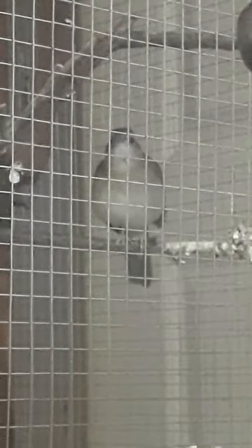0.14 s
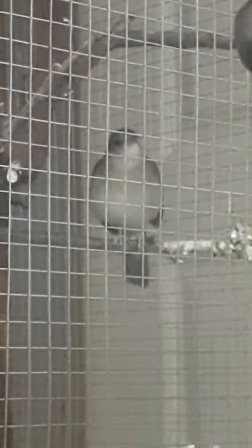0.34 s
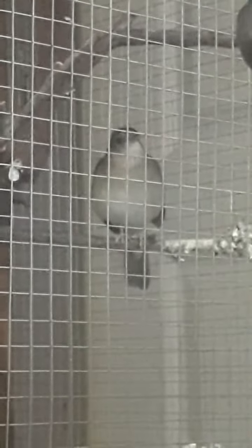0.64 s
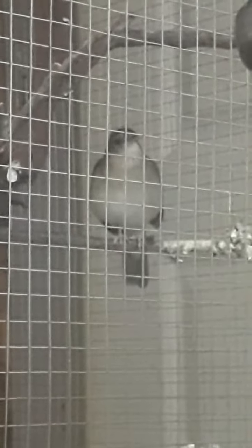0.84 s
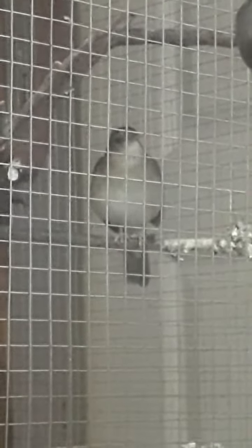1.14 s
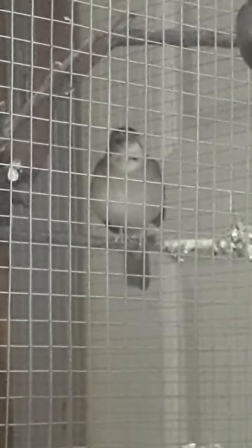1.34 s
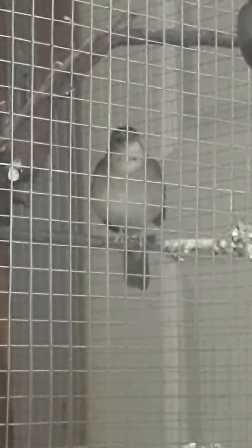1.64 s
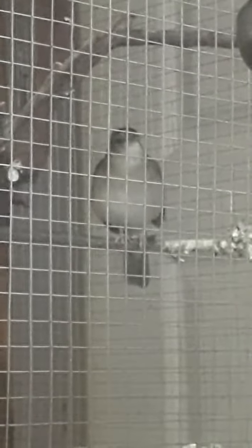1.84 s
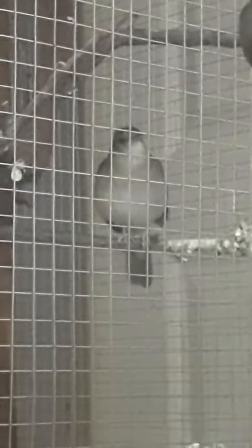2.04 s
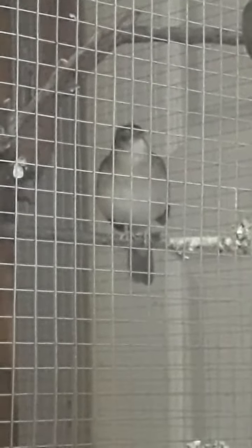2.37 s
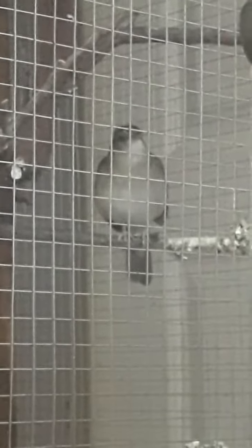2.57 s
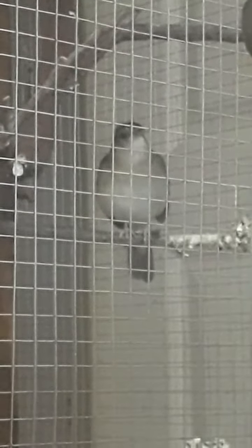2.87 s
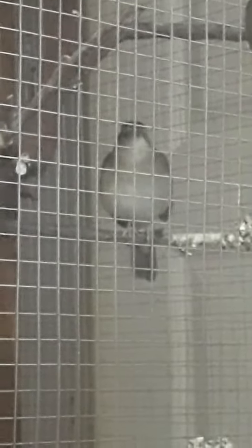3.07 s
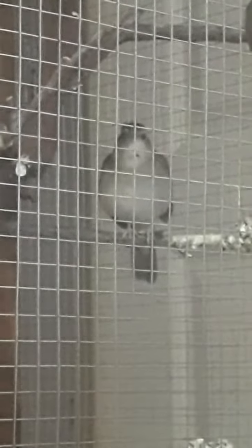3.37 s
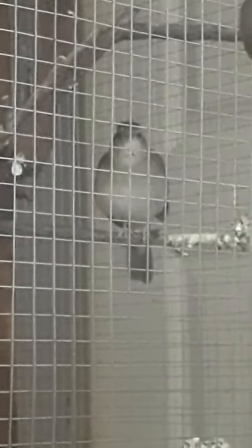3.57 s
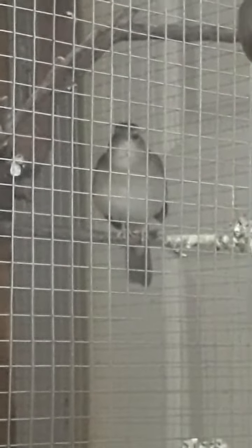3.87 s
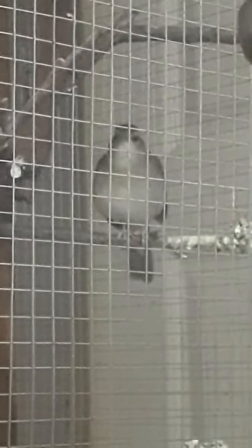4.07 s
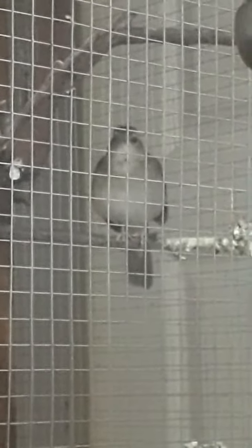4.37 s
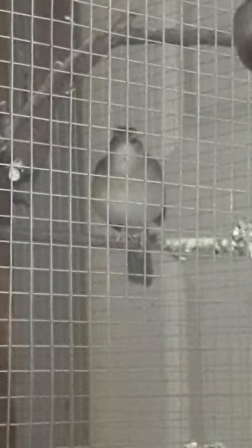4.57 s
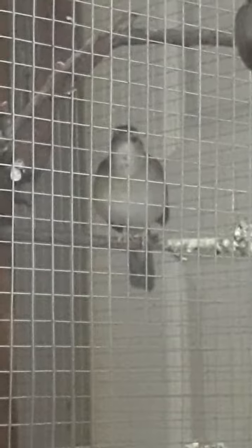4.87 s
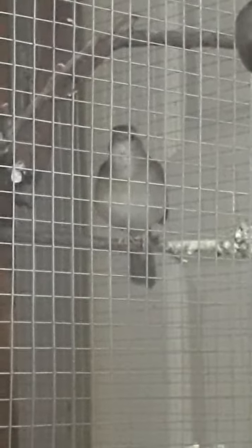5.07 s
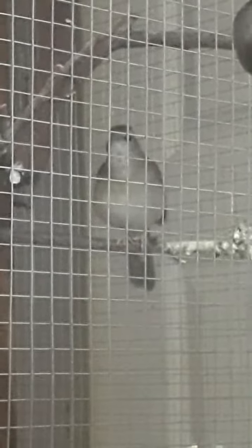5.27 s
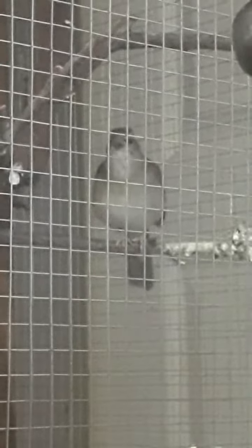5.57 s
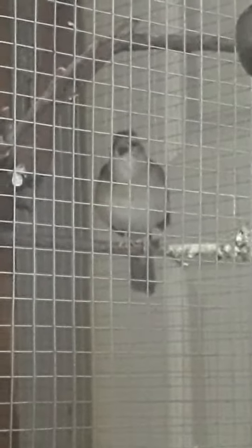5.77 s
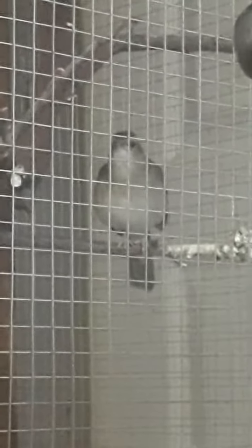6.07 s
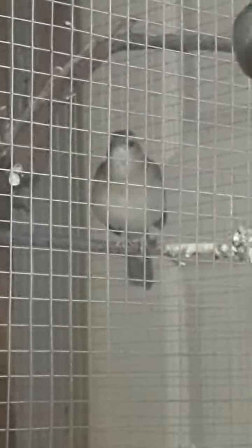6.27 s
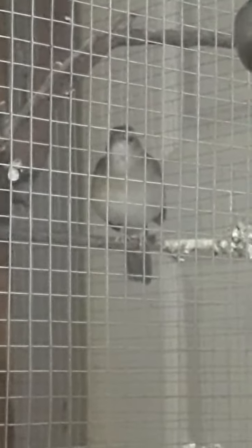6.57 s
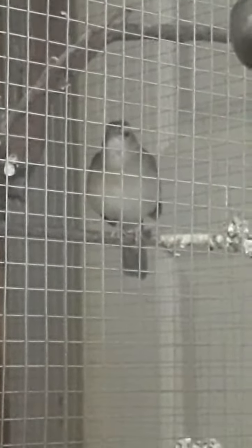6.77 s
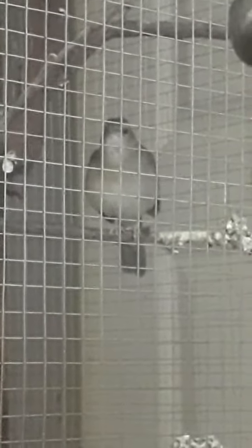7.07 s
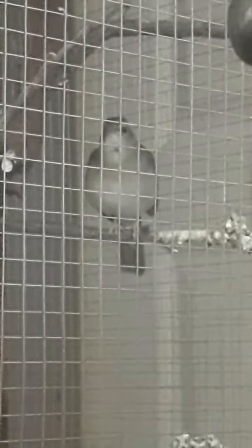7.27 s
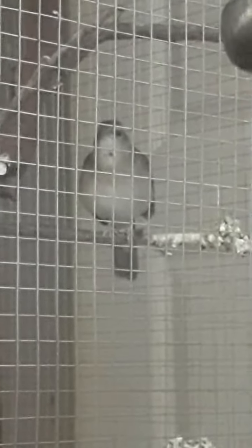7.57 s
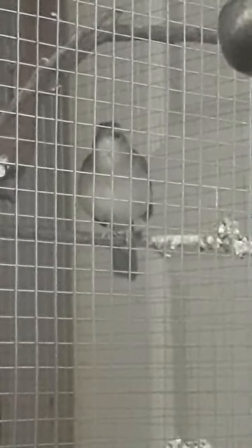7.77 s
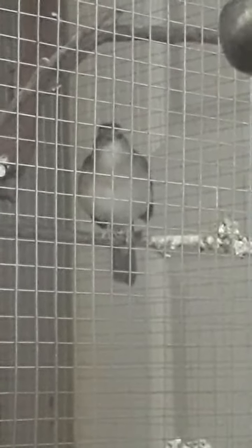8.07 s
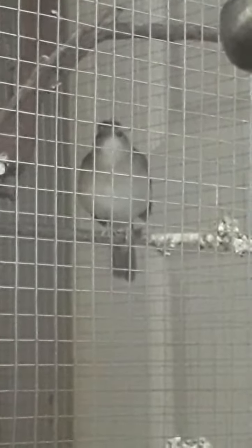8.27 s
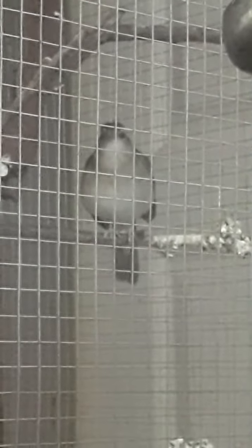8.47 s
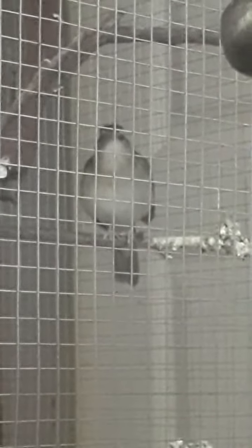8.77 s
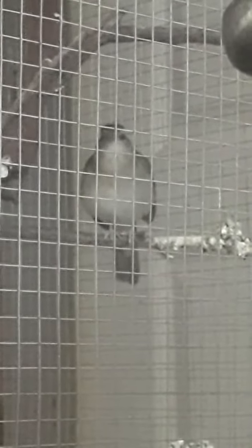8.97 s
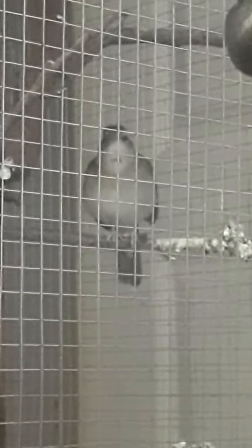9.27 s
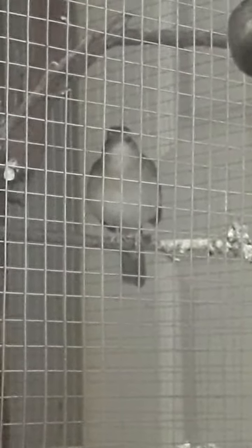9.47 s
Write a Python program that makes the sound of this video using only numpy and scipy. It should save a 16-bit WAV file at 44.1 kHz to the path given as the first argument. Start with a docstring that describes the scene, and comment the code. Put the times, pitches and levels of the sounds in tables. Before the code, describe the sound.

A caged songbird sings varied whistles, croaks and rattles with short pauses in a small, slightly echoing room.

```python
"""A caged nightingale sings in a small hard-walled room.
Membranes in its syrinx vibrate steadily in whistles and irregularly in rasps, slurs and wheezes;
pulses ring its throat in rattles of short croaks. Wall reflections smear every note.
Something rustles and ticks softly at the cage, over a faint ring and still air.
The loudest notes distort the microphone a little."""
import sys
import numpy as np
from scipy import signal
from scipy.fft import rfft, irfft, next_fast_len
from scipy.io import wavfile

SR = 44100
rng = np.random.default_rng(int(sys.argv[2]) if len(sys.argv) > 2 else 0)


def log_audio(samples):
    """Write samples as a 16-bit WAV file to the path given in sys.argv[1]."""
    # one column per channel
    frames = np.atleast_2d(samples).T
    # limit to full scale, then quantise
    limited = np.clip(frames, -1, 1)
    pcm = np.round(limited * 32767).astype(np.int16)
    wavfile.write(sys.argv[1], SR, pcm)


N = 424683

# Columns ending in _at are positions within a sound, from 0 to 1.
# gliding notes: start_s, length_s, from_hz, to_hz, level_db, swell_at
WHISTLES = [(0.425, 0.053, 3860, 4330, -43, 0.1), (0.502, .222, 3385, 5154, -34.5, 0.61),
            (1.004, 0.054, 3820, 4200, -40, 0.2), (1.092, 0.19, 3990, 5160, -35.5, 0.59),
            (1.599, 0.038, 3950, 4330, -40, 0.12), (1.673, 0.075, 3570, 4470, -40, .3),
            (1.78, 0.099, 4800, 4780, -45, 0.18), (4.112, .085, 3040, 2800, -39, 0.6),
            (5.256, 0.089, 3080, 3768, -29.5, 0.63), (6.148, 0.056, 6800, 7550, -43.5, 0.23),
            (6.216, .055, 5960, 5290, -43.5, 0.99), (6.647, 0.027, 2180, 2850, -41, 0.36),
            (6.788, 0.027, 2635, 3460, -32.5, 0), (6.917, .025, 4970, 5200, -49.5, .4),
            (9.258, 0.034, 2460, 2910, -37.5, 0.4)]  # soft, levelling off
CHIRPS = [(1.09, 0.022, 2190, 2895, -35, 0.66), (2.429, 0.018, 2250, 2820, -38, 0.44),
          (3.038, 0.025, 2150, 2926, -29.5, 0.66), (3.145, .029, 2490, 3770, -25.5, .5),
          (3.292, .03, 2410, 3770, -28.5, 0.45)]  # short up-sweeps
WHEEZES = [(3.993, .255, 1481, 1826, -41.5, 0.17), (4.545, 0.18, 1397, 1834, -41.5, .3)]  # low and strained
WHINES = [(9.33, .30, 1481, 2260, -55.5, 0.73)]  # rising in pitch, slowly fading
# harsh glides: start_s, length_s, from_hz, to_hz, level_db, swell_at, roughness
RASPS = [(0, .027, 5500, 5725, -17, 0, 0.074), (0, .026, 7370, 8420, -15.5, 0, .11),
         (0.716, .065, 4706, 2854, -31.5, 0.59, .08), (1.279, .05, 4980, 3090, -31.5, 0.93, .07),
         (2.002, .05, 2610, 2846, -51, 0.06, .06), (2.098, .075, 2920, 3600, -42, 1, .12),
         (2.177, .08, 4075, 4900, -32.5, 0.95, 0.027), (2.202, 0.043, 5920, 6270, -23, 0.42, 0.0064),
         (4.163, 0.069, 5150, 5450, -49, .4, .08), (4.626, 0.078, 3550, 3474, -30.5, 1, 0.076),
         (4.814, .11, 4160, 3100, -35.5, 0.55, .1), (5.126, .134, 4580, 5100, -44, 0.01, 0.22),
         (5.486, .035, 4700, 5200, -42, .8, .1), (6.059, 0.0146, 3310, 2290, -25.5, 0, 0.116),
         (6.092, 0.013, 3010, 2080, -33, 0.37, .12), (6.585, .04, 3506, 4100, -41.5, .6, .16),
         (6.811, .042, 3664, 4580, -37, 0.4, .09), (7.574, .085, 3780, 6350, -42, 0.81, .12),
         (7.758, .08, 3820, 6450, -43.5, .75, .12)]
# falling slurs: start_s, length_s, from_hz, to_hz, level_db
SLURS = [(4.258, 0.19, 3697, 2210, -27), (4.692, .16, 3485, 2282, -21.5)]
# low two-note calls: start_s, then the held note's delay_s, length_s, from_hz, to_hz, level_db, swell_at
LOW_CALLS = [(4.966, 0.053, 0.061, 2370, 2350, -14, 0.35), (5.14, 0.048, 0.064, 2207, 2192, -12, 0.54),
             (5.327, .049, .056, 2242, 2105, -10.5, 0.34)]
# high three-note calls: start_s, middle_from_hz, middle_to_hz, middle_db,
# then the warble's delay_s, length_s, from_hz, to_hz, level_db
HIGH_CALLS = [(5.516, 3716, 3415, -11, 0.053, 0.052, 5022, 5494, -7.5),
              (5.686, 3258, 3460, -14.5, 0.057, 0.041, 4900, 5264, -9.5),
              (5.859, 3288, 3554, -18, .048, 0.043, 5110, 5153, -11.5)]
# arched zips: start_s, rise_s, fall_s, end_hz, flick_hz, level_db, rasp_db
ZIPS = [(8.325, 0.011, 0.032, 3565, 1301, -19, -38), (8.422, 0.011, .028, 3400, 1352, -16, -32.5),
        (8.578, .023, 0.032, 3116, 0, -18.5, -48), (8.694, 0.01, .036, 3370, 1201, -18, -36.5)]
# hooked whistles: start_s, length_s, from_hz, top_hz, end_hz, hook_s, level_db, swell_at
HOOKS = [(8.887, .07, 4080, 4280, 2830, 0.031, -17.5, 0.64),
         (8.967, .078, 2807, 3560, 2100, 0.018, -16.5, 0.38),
         (9.345, 0.0553, 6540, 7090, 5910, .026, -20, 0.98)]
# one whistle that dips and swoops up: time_s, pitch_hz, level_db
SWOOP = [(7.914, 3170, -37.5), (7.938, 3073, -26.5), (7.965, 2973, -30), (8.002, 4066, -20.5),
         (8.045, 4520, -22), (8.081, 4637, -21)]
# harmonics of each kind of note, from the fundamental up: relative_db
WHISTLE_DB = [-1.5, -29.5, -34.5, -44.5, -39.5]
CHIRP_DB = [11, -3.5, -16, -26.5]
WHEEZE_DB = [0, 4, 5.5, -14, -16, -17]
WHINE_DB = [8, -3]
RASP_DB = [4.5, -23.5, -34, -39, -35.5, -31]
SLUR_DB = [6, -24, -34, -40, -33.5, -34]
LOW_CALL_DB = [-3.5, -38, -40.5, -42.5, -34.5, -40, -41, -48.5]
HIGH_CALL_DB = [-6.5, -39.5, -49.5, -48.5]
ZIP_DB = [-6, -34, -46.5, -56]
FULL_DB = [-4, -34, -43, -47.5, -44]
# double croaks: start_s, second_delay_s, relative_db
CHURR = [(1.165, 0.025, -38.5), (1.2411, 0.028, -38.5), (1.3131, 0.036, -36), (1.4065, 0.029, -37),
         (1.492, .021, -39), (1.5865, 0.024, -39)]
# short events: start_s, relative_db
CHUCKS = [(0.1474, -30), (2.7534, -28), (2.9566, -27.5), (3.1272, -26.5), (3.2857, -27.5), (3.428, -24),
          (3.6124, -25.5)]  # round croaks
TUCKS = [(6.0604, -32), (6.0944, -35), (9.1121, -26.5), (9.1611, -29.5), (9.2183, -30), (9.2713, -25)]  # very short dry croaks
TICKS = [(2.4046, -44), (2.5262, -47), (2.8444, -45.5), (3.4456, -33.5), (6.061, -40), (6.275, -37.5),
         (6.408, -36), (6.539, -41), (6.6231, -30), (6.6657, -27.5)]  # light contacts at the cage
BUMPS = [(0.615, -42.5), (2.086, -35.5), (3.484, -31.5), (6.28, -33), (6.624, -37)]  # soft, dull contacts
# rustling at the cage: start_s, length_s, level_db, swell_at
RUSTLES = [(2.394, 0.35, -56, 0.04), (3.401, .2, -58.5, 0.09), (6.259, 0.66, -51.5, 0.63)]
# faint ring: start_s, length_s, from_hz, to_hz, level_db, swell_at
RING = (6.3, .98, 1428, 1430, -61.5, .46)
# spectral shapes: frequency_hz, gain_db
BEAK = [(4000, -2.5), (6500, -3.5), (11000, -1), (13800, 3.5), (15500, 1)]  # the open beak favours the highest overtones
THROAT = [(500, -35), (900, -37), (1120, -6.5), (1600, 2), (2100, 4.5), (2650, -6.5), (3800, -11),
          (5500, -27.5), (13000, -46.5)]  # resonances at a gape of 1
RUSTLE_SPECTRUM = [(71, -37), (120, -16.5), (271, -10), (563, -20.5), (1460, -14), (2110, -18),
                   (15500, -28)]
AIR_SPECTRUM = [(35, -35), (60, -3.5), (443, -15), (1420, -13), (1630, -16.5), (1910, -17), (2980, -24),
                (6120, -24.5), (10400, -33.5), (15500, -37)]
TICK_SPECTRUM = [(300, 3.1), (3000, 22), (8000, 18), (15000, 5.9)]
BUMP_SPECTRUM = [(60, -43), (200, -14), (1000, 0), (2500, -10.5), (6000, -30)]
# reverberation time of the room: frequency_hz, t60_s
ROOM_DECAY = [(200, 0.49), (1500, 0.49), (3500, 0.41), (6000, 0.25), (10000, 0.15), (16000, 0.08)]

CLEAR_SHAKE_HZ, HARSH_SHAKE_HZ = 300, 400  # bandwidth of the pitch jitter
BAND_EDGE_HZ = 15900


def syrinx(hz, level_db, partials_db, shake_hz=CLEAR_SHAKE_HZ, waver=.005, rough=0, split=0):
    """Membrane oscillation: harmonics follow a pitch gesture, and irregular vibration adds jitter."""
    t = np.arange(len(hz)) / SR
    hoarseness = np.interp(level_db, [-50, -36, -22], [2.8, 1.5, 1])
    jitter = waver * hoarseness * (hz / 4400) ** 1.5 + .75 * rough  # full, low notes are the purest
    phase = 2 * np.pi * np.cumsum(hz * (1 + jitter * wander(len(t), shake_hz))) / SR
    tone = sum(gain_of(db + read(BEAK, k * hz)) * np.sin(k * phase) * (k * hz < SR / 2)
               for k, db in enumerate(partials_db, 1))
    # period doubling: strong and weak cycles alternate, giving an undertone an octave down
    tone *= 1 + split * rough * np.cos(phase / 2)
    edges = np.clip(np.minimum(t, t[-1] - t) / .0032, 0, 1)
    return gain_of(level_db) * unit_rms(tone) * np.sin(edges * np.pi / 2) ** 2


def glide(start, length, from_hz, to_hz, db, swell_at, rough=0, *,
          ease, onset_db, end_db, clears=.5, **voice):
    """Frequency sweep: a note slides one way and loses a share of its roughness; gives start, sound."""
    u = progress(length)
    hz = slide(u, from_hz, to_hz, ease)
    level_db = db + swell(u, swell_at, onset_db, end_db)
    return start, syrinx(hz, level_db, rough=rough * (1 - clears * u), **voice)


def twitter():
    """Jitter and harmonic balance set the timbre: whistles, chirps, rasps, wheezes and a whine."""
    harsh = dict(shake_hz=HARSH_SHAKE_HZ, waver=0)
    for row in WHISTLES:
        yield glide(*row, rough=.028, ease=2, onset_db=-11, end_db=-8.5, clears=.99,
                    partials_db=WHISTLE_DB, waver=.006, split=.75)
    for row in CHIRPS:
        yield glide(*row, ease=2.1, onset_db=-10.5, end_db=-20, partials_db=CHIRP_DB, waver=.006)
    for row in RASPS:
        yield glide(*row, ease=1, onset_db=-12, end_db=-11.5, partials_db=RASP_DB, split=1.7, **harsh)
    for row in WHEEZES:
        yield glide(*row, rough=.12, ease=1.3, onset_db=-10, end_db=-12.5, clears=.3,
                    partials_db=WHEEZE_DB, **harsh)
    for row in WHINES:
        yield glide(*row, rough=.025, ease=1.05, onset_db=1.5, end_db=-2, clears=.74,
                    partials_db=WHINE_DB, **harsh)


def slurs(fall_s=.086, attack_s=.029, hold_s=.092):
    """Tension sets pitch: as it relaxes along a bell curve, the note sinks and loses its harshness."""
    for start, length, from_hz, to_hz, db in SLURS:
        t = progress(length) * length
        tension = np.exp(-(t / fall_s) ** 2)
        hz = to_hz + (from_hz - to_hz) * tension
        level_db = db + np.interp(t, [0, attack_s, attack_s + hold_s, length], [-24, 0, 2.5, -12])
        yield start, syrinx(hz, level_db, SLUR_DB, HARSH_SHAKE_HZ, rough=.095 * tension ** 1.3, split=1.9)


def low_calls(overshoot_hz=230, settle_s=.004):
    """Pitch overshoot: after a quick drop and a break, a pure held note starts sharp and settles."""
    for start, delay, length, from_hz, to_hz, db, swell_at in LOW_CALLS:
        yield glide(start, length=.031, from_hz=2250, to_hz=1377, db=-14.5, swell_at=.56,
                    ease=1.15, onset_db=-10, end_db=-21, partials_db=LOW_CALL_DB)
        u = progress(length)
        hz = slide(u, from_hz, to_hz, ease=.92) + overshoot_hz * np.exp(-u * length / settle_s)
        yield start + delay, syrinx(hz, db + swell(u, swell_at, onset_db=-6, end_db=-12), LOW_CALL_DB)


def high_calls(grace_lead_s=.011, warble_hz=128, depth_hz=380, narrowing_s=.025):
    """Biphonation: the two sides of the syrinx overlap in a grace and a middle note; a warble follows."""
    for start, *middle, delay, length, from_hz, to_hz, db in HIGH_CALLS:
        yield glide(start, length=.017, from_hz=3750, to_hz=4500, db=-19, swell_at=.21, rough=.06,
                    ease=1.5, onset_db=-5.5, end_db=-5.5, partials_db=RASP_DB)
        yield glide(start + grace_lead_s, delay - grace_lead_s, *middle, swell_at=.37, rough=.02,
                    ease=1.4, onset_db=-6, end_db=-6, clears=1, partials_db=FULL_DB, split=1.4)
        u = progress(length)
        t = u * length
        warble = depth_hz * np.exp(-t / narrowing_s) * np.cos(2 * np.pi * warble_hz * t)
        hz = slide(u, from_hz, to_hz, ease=1.6) + warble
        yield start + delay, syrinx(hz, db + swell(u, .65, onset_db=-4, end_db=-8.5), HIGH_CALL_DB)


def zips(rasp_lead_s=.016, from_hz=3100, top_hz=4500, flick_s=.005, thinning_db_per_hz=.001):
    """Rapid frequency modulation: a rasp opens into an arch, thinning where it flicks above the top."""
    for start, rise, fall, end_hz, flick_hz, db, rasp_db in ZIPS:
        yield glide(start - rasp_lead_s, length=.0235, from_hz=1950, to_hz=2880, db=rasp_db, swell_at=1,
                    rough=.22, ease=.93, onset_db=-11.5, end_db=-1.5, partials_db=RASP_DB,
                    shake_hz=HARSH_SHAKE_HZ, waver=0, split=2.7)
        u = progress(rise + fall)
        t = u * (rise + fall)
        flick = flick_hz * np.exp(-((t - rise) / flick_s) ** 2)
        hz = np.interp(t, [0, rise, rise + fall], [from_hz, top_hz, end_hz]) + flick
        level_db = db + swell(u, .42, onset_db=-8, end_db=-8) - thinning_db_per_hz * flick
        yield start, syrinx(hz, level_db, ZIP_DB, waver=.011)


def full_whistles():
    """Nearly sinusoidal vibration: whistles that climb and hook downward, and one long swoop."""
    for start, length, from_hz, top_hz, end_hz, hook_s, db, swell_at in HOOKS:
        u = progress(length)
        turn = 1 - hook_s / length
        climb = slide(np.minimum(u / turn, 1), from_hz, top_hz, ease=2.18)
        drop = (end_hz - top_hz) * np.maximum((u - turn) / (1 - turn), 0) ** 1.46
        yield start, syrinx(climb + drop, db + swell(u, swell_at, onset_db=-16, end_db=-16.5), FULL_DB)
    times, hz, db = np.transpose(SWOOP)
    t = np.arange(times[0], times[-1], 1 / SR)
    yield times[0], syrinx(np.interp(t, times, hz), np.interp(t, times, db), FULL_DB)


def croaks(rows, pitch_hz, length_s, fall, gape, tilt_db, gain_db, breath=.3):
    """Source and filter: pulses and breath noise ring the throat, higher as the beak gapes."""
    out, u = np.zeros(N), np.linspace(0, 1, int(length_s * SR))
    throat = [(hz * gape, db) for hz, db in THROAT]
    envelope = np.minimum(u / .16, 1) * (1 - u) ** 1.2
    arch_hz = pitch_hz * (1 - fall * (u - .3) ** 2)
    for start, db in rows:
        stray_hz = breath * (130 * rng.uniform(-1, 1) + 110 * wander(len(u), 250))
        phase = 2 * np.pi * np.cumsum(arch_hz + stray_hz) / SR
        pulses = sum(np.cos(k * phase) for k in range(1, int(BAND_EDGE_HZ / pitch_hz)))
        drive = (1 - breath) * unit_rms(pulses) + breath * rng.standard_normal(len(u))
        add(out, start, gain_of(db + gain_db) * unit_rms(coloured(drive * envelope, throat, tilt_db)))
    return out


def roll(start_s, gap_s, count, db, **shape):
    """Periodic repetition: a run of croaks swells and eases off; gives rows of start_s, relative_db."""
    return zip(start_s + gap_s * np.arange(count), db + swell(np.linspace(0, 1, count), **shape))


def nightingale():
    """Superposition: tonal notes and pulsed croaks add up to the song."""
    out = np.zeros(N)
    for notes in (twitter(), slurs(), low_calls(), high_calls(), zips(), full_whistles()):
        for start, sound in notes:
            add(out, start, sound)
    churr = [(start + delay, db) for start, second, db in CHURR for delay in (0, second)]
    rattle = roll(3.655, gap_s=.0431, count=6, db=-24, swell_at=.65, onset_db=-8, end_db=-2)
    purr = roll(7.3125, gap_s=.042, count=8, db=-22.5, swell_at=.81, onset_db=-9.5, end_db=-1.5)
    out += croaks(CHUCKS, pitch_hz=545.2, length_s=.043, fall=.747, gape=1.06, tilt_db=-2.5,
                  gain_db=-13.5, breath=.14)
    out += croaks(churr, pitch_hz=410, length_s=.048, fall=.47, gape=.93, tilt_db=.5, gain_db=-7.5)
    out += croaks(rattle, pitch_hz=721, length_s=.0356, fall=.48, gape=1.207, tilt_db=-4, gain_db=-11)
    out += croaks(purr, pitch_hz=1035.4, length_s=.02, fall=.3, gape=.96, tilt_db=-2.5, gain_db=-11.5)
    out += croaks(TUCKS, pitch_hz=828, length_s=.0085, fall=.46, gape=.92, tilt_db=3, gain_db=-6.5)
    return out


def knocks(rows, spectrum, t60_s, gain_db):
    """Damped impacts: each small contact at the cage is a puff of noise that decays exponentially."""
    out, t = np.zeros(N), np.arange(SR // 10) / SR
    for start, db in rows:
        puff = unit_rms(coloured(rng.standard_normal(len(t)), spectrum))
        add(out, start, gain_of(db + gain_db - 60 * t / t60_s) * puff)
    return out


def rustle(grain_db=5.4, grain_hz=81):
    """Random amplitude modulation breaks noise into the grains of a rustle."""
    out = np.zeros(N)
    for start, length, db, swell_at in RUSTLES:
        u = progress(length)
        grains = rng.standard_normal(len(u)) * gain_of(grain_db * wander(len(u), grain_hz))
        envelope = gain_of(db + swell(u, swell_at, onset_db=-9.5, end_db=-12))
        envelope *= signal.windows.tukey(len(u), .1)
        add(out, start, envelope * unit_rms(coloured(grains, RUSTLE_SPECTRUM)))
    return out


def ring():
    """A single partial of almost steady frequency swells and fades as a faint ring."""
    out = np.zeros(N)
    add(out, *glide(*RING, ease=1, onset_db=-14, end_db=-19, partials_db=[0], shake_hz=30, waver=.003))
    return out


def room(x, near_t60_s=.09, tail_db=-9.5):
    """Reverberation: early reflections from near walls, then a diffuse tail whose treble dies first."""
    t = np.arange(SR) / SR
    dense_taps = rng.choice([-1., 1.], SR) * (rng.random(SR) < 4000 / SR) * (t > .008)
    hz, frame_s, spectra = signal.stft(dense_taps, SR, nperseg=256)
    decay = gain_of(-60 * frame_s / read(ROOM_DECAY, hz)[:, None])
    tail = signal.istft(spectra * decay, SR, nperseg=256)[1][:SR]
    sparse_taps = rng.choice([-1., 1.], SR) * (rng.random(SR) < 700 / SR) * (t > .003)
    near = sparse_taps * gain_of(-60 * t / near_t60_s)
    echoes = unit_rms(near) + gain_of(tail_db) * unit_rms(tail)
    return x + signal.fftconvolve(x, echoes / np.sqrt(SR))[:N]


def still_air(level_db=-61):
    """Stationary broadband noise, strongest in the bass, is the hush of the room."""
    return gain_of(level_db) * unit_rms(coloured(rng.standard_normal(N), AIR_SPECTRUM))


def gain_of(db):
    """Decibels as an amplitude ratio."""
    return 10 ** (np.asarray(db) / 20)


def unit_rms(x):
    """Normalisation to rms 1."""
    return x / np.sqrt(np.mean(x ** 2) + 1e-20)


def read(points, hz):
    """Interpolation of a table on a log-frequency axis."""
    f, value = np.transpose(points)
    return np.interp(np.log(hz + 1), np.log(f + 1), value)


def add(mix, start_s, sound):
    """Superposition of a sound onto the mix."""
    part = mix[max(round(start_s * SR), 0):][:len(sound)]
    part += sound[:len(part)]


def coloured(x, spectrum, tilt_db=0):
    """Linear filtering by a spectrum, tilted by tilt_db an octave between 1 and 6 kHz."""
    size = next_fast_len(2 * len(x))
    hz = np.fft.rfftfreq(size, 1 / SR)
    octaves = np.log2(np.clip(hz, 1000, 6000) / 2000)
    return irfft(rfft(x, size) * gain_of(read(spectrum, hz) + tilt_db * octaves), size)[:len(x)]


def wander(size, cutoff_hz):
    """Low-pass noise: a random drift of rms 1."""
    hz = np.fft.rfftfreq(SR, 1 / SR)
    drift = irfft(rfft(rng.standard_normal(SR)) / (1 + (hz / cutoff_hz) ** 4))
    return unit_rms(drift)[np.arange(size) % SR]


def progress(length_s):
    """Normalised time, from 0 to 1 over a sound."""
    return np.linspace(0, 1, int(length_s * SR))


def slide(u, from_hz, to_hz, ease):
    """Power-law pitch contour; an ease above 1 makes it level off."""
    return to_hz + (from_hz - to_hz) * (1 - u) ** ease


def swell(u, swell_at, onset_db, end_db):
    """Level envelope: from onset_db through 0 dB at swell_at to end_db."""
    return np.interp(u, [0, np.clip(swell_at, .01, .99), 1], [onset_db, 0, end_db])


def scene():
    """Bird and cage excite the same reverberant room, over still air."""
    air = still_air()
    bird = nightingale()
    ticks = knocks(TICKS, TICK_SPECTRUM, t60_s=.051, gain_db=-7.5)
    bumps = knocks(BUMPS, BUMP_SPECTRUM, t60_s=.33, gain_db=-16.5)
    return (room(bird + ticks + bumps + rustle() + ring()) + air)[None]


def record(dry, asymmetry=.032, knee=.7, headroom=.2, bass_cut_hz=95):
    """Nonlinear transduction: the microphone bends and rounds the loudest peaks, then limits the band."""
    bent = dry - asymmetry * dry ** 2
    excess = np.maximum(abs(bent) - knee, 0)
    rounded = bent - np.sign(bent) * (excess - headroom * np.tanh(excess / headroom))
    highpass = signal.butter(2, bass_cut_hz, "highpass", fs=SR, output="sos")
    lowpass = signal.firwin(511, BAND_EDGE_HZ, window=("kaiser", 9), fs=SR)
    return signal.oaconvolve(signal.sosfilt(highpass, rounded), lowpass[None], "same")


dry = scene()
out = record(dry)
log_audio(out)
```